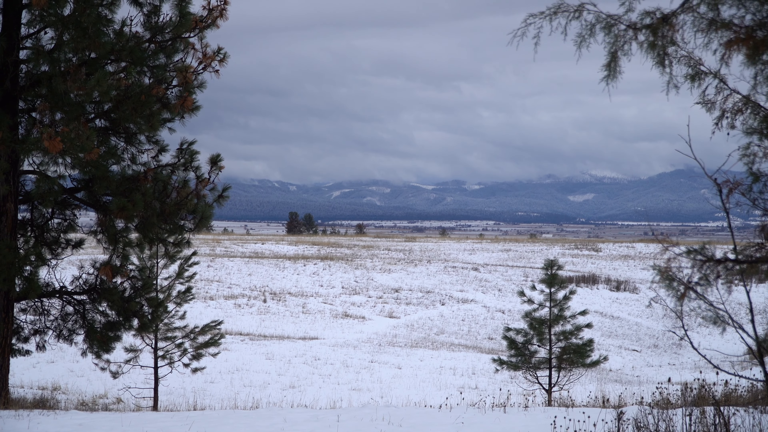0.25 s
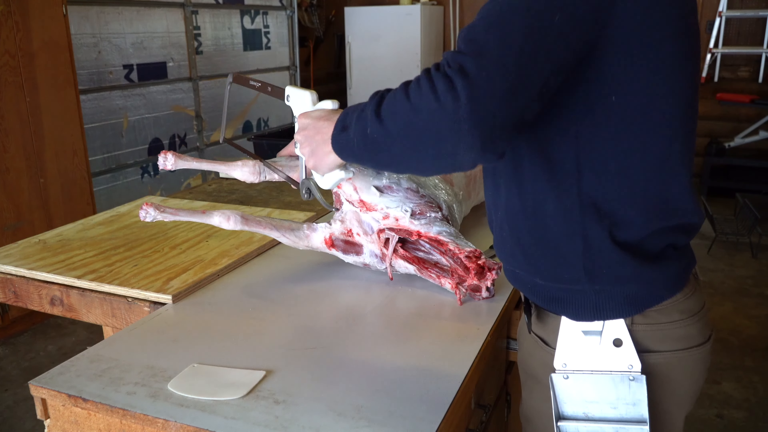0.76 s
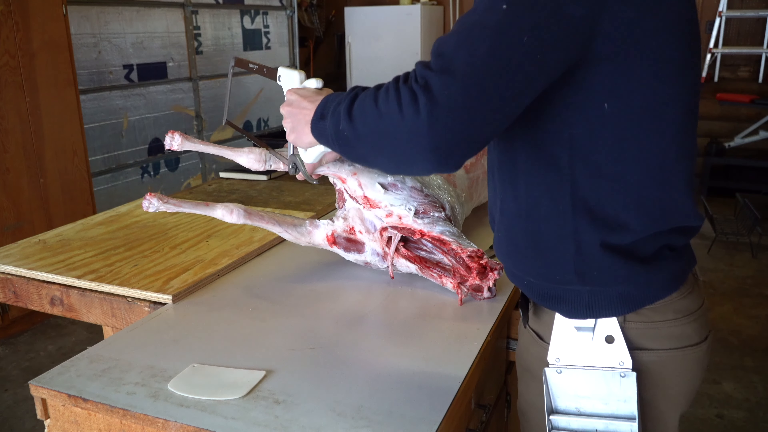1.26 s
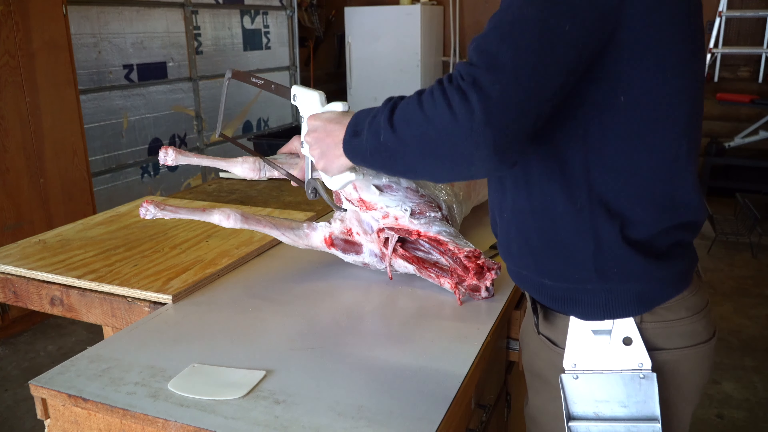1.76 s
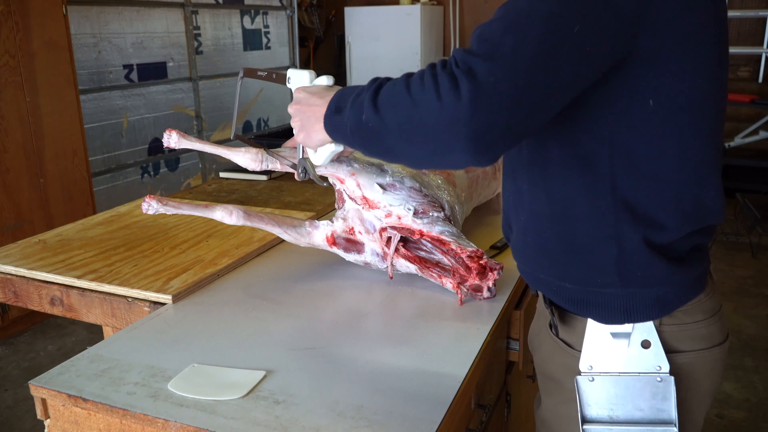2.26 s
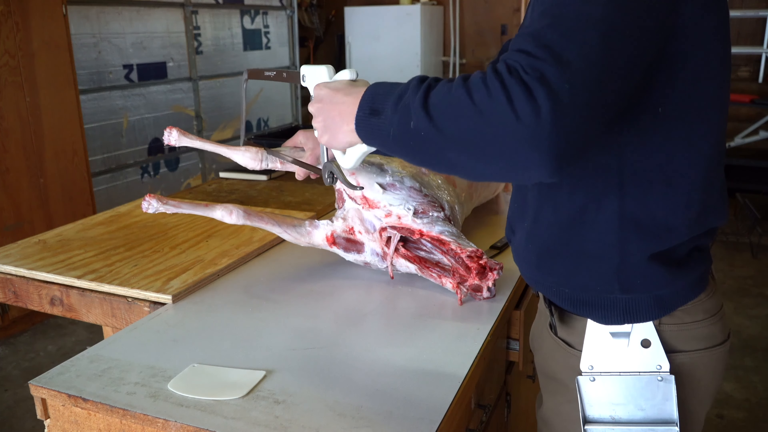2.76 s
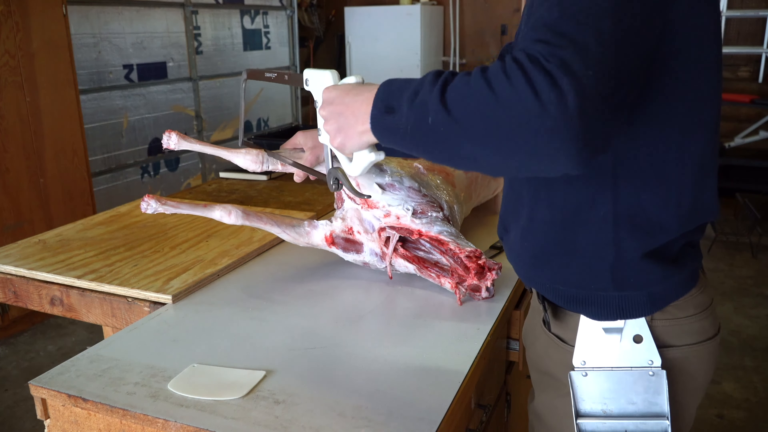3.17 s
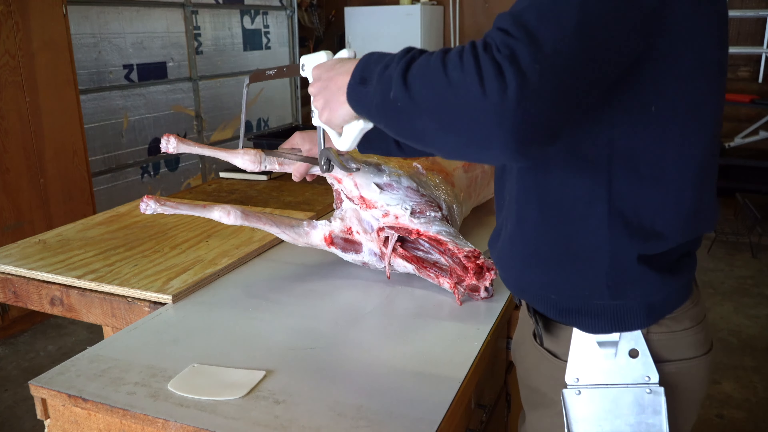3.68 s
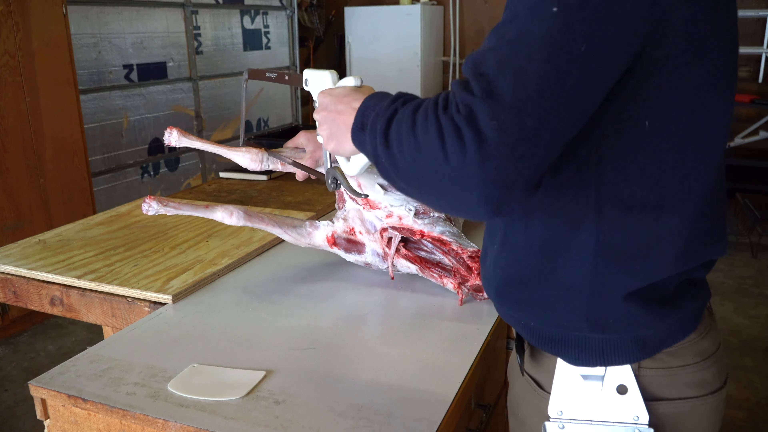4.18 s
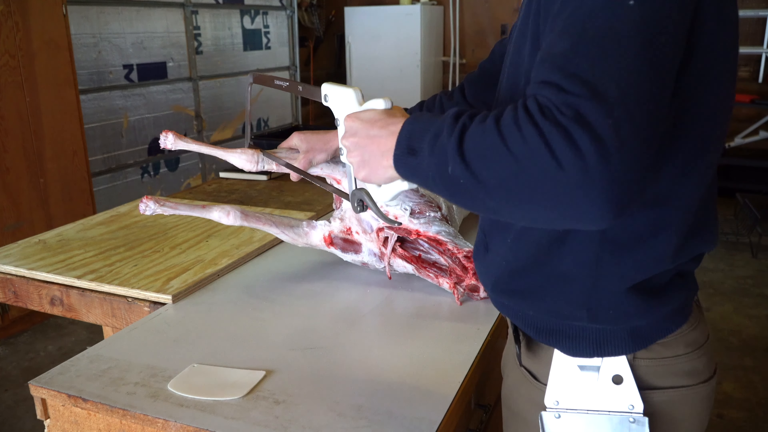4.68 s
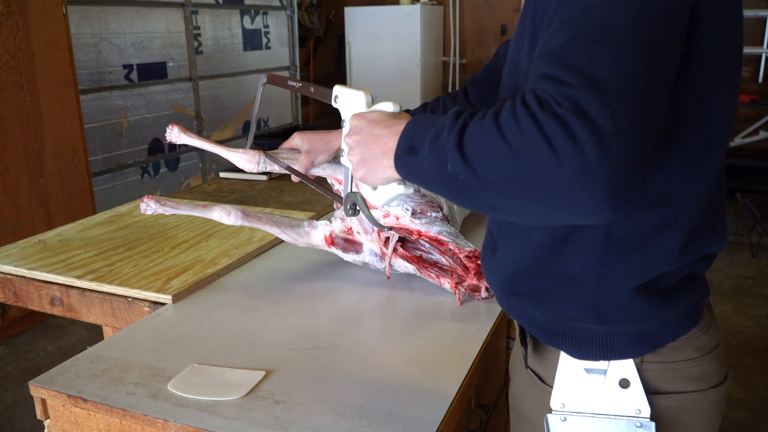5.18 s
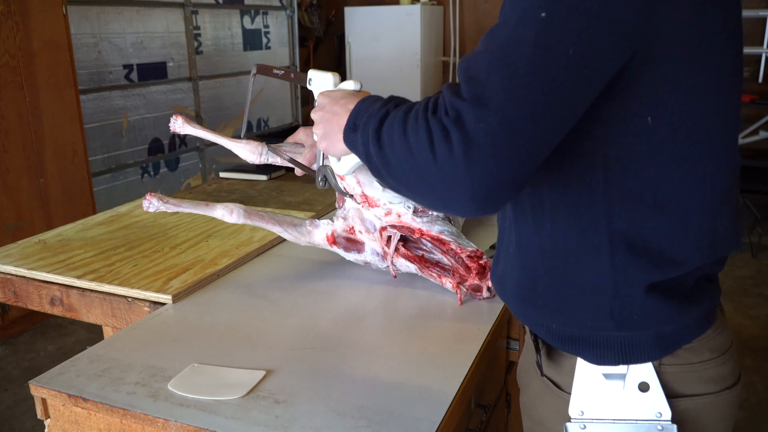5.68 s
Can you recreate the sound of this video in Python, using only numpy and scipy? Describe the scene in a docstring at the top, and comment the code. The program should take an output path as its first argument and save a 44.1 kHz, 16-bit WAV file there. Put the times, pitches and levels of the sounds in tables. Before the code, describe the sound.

Faint wind rumble, then a sudden change to indoor air and wavering low motor hum. A hand saw bites bone in brief, rough strokes, first isolated, later closer together and harder, some starting with a sharp knock. Steel sings brightly, the carcass judders softly on the table, and a short garage reverberation trails each stroke, heard from moderately close.

```python
"""A butcher's bow saw works through a carcass on a table in a garage, after half a second of low wind over a snowy field.
On each stroke the teeth chop into bone at a rate set by the arm's speed; they shake the carcass, throw grit and ring the blade.
Resonances swell under the teeth, the blade chatters, ticks and scuffs, and the carcass judders on the table.
The bare room rings on, over its air and a faint hum."""
import sys
import numpy as np
from scipy import signal
from scipy.fft import rfft, irfft
from scipy.io import wavfile

SR = 44100
rng = np.random.default_rng(int(sys.argv[2]) if len(sys.argv) > 2 else 0)


def unload_wav(signal):
    """Save mono or channel-first audio to the path in sys.argv[1] as 16-bit WAV at rate SR, clipped to [-1, 1]."""
    wavfile.write(
        sys.argv[1],
        SR,
        np.round(np.clip(np.atleast_2d(signal).T, -1, 1) * 32767).astype(np.int16),
    )


N = 261954
T = np.arange(N) / SR  # time in s

# the blade's cluster of high modes: pitch_hz, width_hz, relative level_db
BLADE_MODES = [(4820, 140, -8), (4933, 150, -16), (4970, 27, -15), (5604, 260, -14), (5450, 40, -8),
               (5534, 170, 5), (6020, 130, -18), (8980, 310, -15), (10600, 84, -81)]


def undb(db):
    """Decibels to gain."""
    return 10 ** (np.asarray(db) / 20)


def unit(x):
    """Scale to rms 1."""
    return x / np.sqrt(np.mean(x ** 2))


def convolve(x, response):
    """Pass a sound through an impulse response."""
    return signal.fftconvolve(x, response)[:len(x)]


def colour(x, points, size=2048):
    """Minimum-phase filter of unit energy through (Hz, dB) points."""
    hz, db = np.transpose(points)
    grid = np.maximum(np.arange(size + 1) * SR / (2 * size), 1)
    level_db = np.interp(np.log(grid), np.log(hz), db)
    # folding the cepstrum makes the response causal
    cepstrum = irfft(np.log(undb(level_db)))
    cepstrum[1:size] *= 2
    cepstrum[size + 1:] = 0
    response = irfft(np.exp(rfft(cepstrum)))
    return convolve(x, response / np.linalg.norm(response))


def walk(rate):
    """Random wandering through `rate` knots a second, spread near 1."""
    knots = rng.standard_normal(4096)
    return np.interp(T * rate, np.arange(len(knots)), knots)


def pulses(hz, jitter, scatter_db):
    """One click a cycle, uneven in time and size; also the phase within the cycle."""
    turns = np.cumsum(hz * (1 + jitter * walk(300))) / SR
    at = np.flatnonzero(np.diff(np.floor(turns)))
    # each click is shared between the two samples it falls between
    late = (np.floor(turns[at + 1]) - turns[at]) / (turns[at + 1] - turns[at])
    scatter = undb(scatter_db * rng.standard_normal(N)[:len(at)])
    sizes = scatter / np.sqrt(hz[at])  # faster clicks are smaller, for even power
    train = np.bincount(at, sizes * (1 - late), N) + np.bincount(at + 1, sizes * late, N)
    return unit(train - train.mean()), turns % 1


def grit(spread_db):
    """Dense tiny fractures as noise whose size varies from sample to sample."""
    spread = np.minimum(rng.exponential(size=N), 2 * np.pi)
    return unit(rng.standard_normal(N) * undb(spread_db * spread))


def ring(x, modes):
    """Damped modes struck together, alternating in sign; unit energy."""
    t = T[:SR // 2]
    response = 0
    for k, (hz, width, db) in enumerate(modes):
        decay = width * np.exp(-np.pi * width * t)
        response = response + (-1) ** k * undb(db) * decay * np.sin(2 * np.pi * hz * t)
    return convolve(x, response / np.linalg.norm(response))


def disperse(x, lag_at_1hz_s):
    """Bending waves run faster the higher they are, so each click arrives as a tiny downward chirp."""
    hz = np.arange(N // 2 + 1) * SR / N
    return irfft(rfft(x) * np.exp(-4j * np.pi * lag_at_1hz_s * np.sqrt(hz)), N)


def saw():
    """Teeth strike bone one after another; strikes shed grit, and rubbing in the same rhythm rings the steel."""
    # bone and bow in a shallow cut, then a deep one: pitch_hz, width_hz, relative level_db
    shallow_modes = [(762, 54, -11), (950, 52, -14), (1258, 14.2, 3.5), (1650, 110, -1), (1780, 26, -4.5),
                     (1850, 85, -8), (2650, 100, -4), (3008, 36, -1), (3820, 36, -54)]
    deep_modes = [(758, 12, -4), (902.3, 6.8, 2), (1240, 34, 3), (1335, 100, 1.5), (1638, 150, -8),
                  (1632, 32, -0.5), (1739, 71, -0.5), (1930, 35, -5), (2187, 17, -3), (2640, 230, -2.5),
                  (3253, 71, -5), (3327, 71, -6.5), (3580, 110, -26), (4174, 120, -11.5)]
    # the table top's resonances: pitch_hz, width_hz, relative level_db
    table_modes = [(93, 8.2, -4), (186, 46, 0.5), (238, 30, -12.5)]
    # colours of bone, tooth buzz, rubbing blade, bone dust and flesh: pitch_hz, relative level_db
    bone_colour = [(300, -14), (600, 1.5), (1000, -4.5), (1700, -6.5), (2300, -22.5), (2800, -1),
                   (3600, -0.5), (4400, -11.5), (6000, -9), (7500, -35), (12000, -54.5)]
    buzz_colour = [(300, -20), (600, 8), (1200, 5), (1900, 8.5), (3000, -0.5), (5000, -35)]
    blade_colour = [(3500, -23), (4500, 8.5), (5100, 18.5), (5550, 5), (6000, -9.5), (6800, -1.5),
                    (9000, -45)]
    dust_colour = [(3000, -14), (6000, 9.5), (7500, -1.5), (8500, 0), (9800, 3), (11000, -1), (13000, -3.5),
                   (15500, -19)]
    carcass_colour = [(30, -39), (70, -36.5), (170, -14), (340, 6), (560, 5), (800, 3.5), (1500, -47)]

    tooth_hz, gains = arm()
    # bone is uneven, so the bite comes and goes within a stroke
    bite, blade_gain, thrum = gains * undb(2.2 * walk(140))
    teeth, phase = pulses(tooth_hz, jitter=.03, scatter_db=2)
    teeth = disperse(teeth, lag_at_1hz_s=.1)
    strike = unit(.5 + np.exp(-phase / .4))
    chips = strike * grit(spread_db=2)
    cutting = bite * unit(teeth + undb(7) * chips)

    # the cut deepens from 0 to 1, and the resonances change with it
    depth = np.clip((T - 2.7) / 1.302, 0, 1)
    shallow = ring(cutting * np.sqrt(1 - depth), shallow_modes)
    deep = ring(cutting * np.sqrt(depth), deep_modes)
    bone = undb(-6.5) * colour(cutting, bone_colour) + undb(-4.5) * (shallow + deep)
    # the tooth rate stands out as a buzz, most of all in a shallow cut
    buzz = undb(-5 - 5 * depth) * colour(bite * teeth, buzz_colour)

    # the flat of the blade rubs the walls of the cut
    rubbing = blade_gain * strike * grit(spread_db=-0.5)
    blade = undb(-4.5) * colour(rubbing, blade_colour) + undb(-8) * ring(rubbing, BLADE_MODES)
    dust_gain = bite ** 0.5 * blade_gain ** 0.63
    dust = undb(-18) * colour(dust_gain * grit(spread_db=3.0), dust_colour)

    # soft flesh passes on mainly the tooth rate itself, and the table rumbles under it
    shaking = thrum * (teeth + undb(-10) * chips)
    carcass = undb(-4.0) * colour(shaking, carcass_colour)
    table = undb(-16.0) * ring(thrum * chips, table_modes)
    return bone + buzz + blade + dust + carcass + table


def arm():
    """Tooth rate and gains of bite, blade and carcass: each stroke engages, speeds up, slows and lets go."""
    # strokes of the saw: start_s, length_s, rising (share of it spent speeding up), top_tooth_rate_hz,
    # bite_db (drive at top speed), blade_db and thrum_db (blade ring and carcass thrum against bite)
    strokes = [ (0.687, 0.23, 0.62, 517.9, -23.5, -4, -7.5), (1.745, 0.15, 0.46, 399, -24.5, -3.5, -6.5),
               (2.117, 0.059, 0.26, 330, -34, 3.5, -4), (2.249, 0.039, 0.68, 249.7, -38.5, 1, -6.5),
               (2.514, 0.13, 0.41, 355.7, -27, -8, -3), (3.798, 0.14, 0.63, 233.3, -33.5, -8.5, -5),
               (4.162, 0.077, 0.48, 401.3, -27.5, 0.5, -8.5), (4.53, 0.144, 0.43, 297.1, -26.5, -11, -6.5),
               (4.768, 0.126, 0.6, 397.5, -21, -1.5, -11), (5.08, 0.12, 0.58, 368, -25, -8, -11.5),
               (5.614, 0.074, 0.84, 405, -20.5, 1, -12.5), (5.899, 0.090, 0.45, 298.6, -30, -6.5, -5.5), ]
    turn_teeth_hz = 227.8  # teeth passing each second at either end of a stroke
    attack_s, release_s = 0.012, 0.0041  # the teeth engage and let go
    # the arm presses less at the ends of a stroke
    slow_bite_db, slow_blade_db, slow_thrum_db = -9.5, -10, -6
    speed_curve = 1.3  # above 1 the arm holds its top speed longer
    swell_curve = 1.31  # above 1 the pressure lingers near its top
    db_per_octave = 5.5  # faster teeth cut louder
    lean_db, blade_lean_db = 6.5, -2  # through a stroke the thrum grows and the flesh damps the blade
    blade_lead = .35  # under 1 the blade sings before the teeth are fully in

    rate, gains = np.full(N, 1. * turn_teeth_hz), np.zeros((3, N))
    for start, length_s, rising, top_hz, bite_db, blade_db, thrum_db in strokes:
        now = (T >= start) & (T < start + length_s + release_s)
        t = T[now] - start
        speed = np.interp(t / length_s, [0, min(rising, 1), 1], [0, 1, 0])
        rate[now] = turn_teeth_hz + (top_hz - turn_teeth_hz) * (1 - (1 - speed) ** speed_curve)
        slack = (1 - speed) ** swell_curve
        lean = t / length_s - .5
        contact = np.clip(np.minimum(t / attack_s, 1 + (length_s - t) / release_s), 0, 1)
        effort = undb(bite_db + db_per_octave * np.log2(rate[now] / top_hz))
        bite = contact * undb(slow_bite_db * slack)
        blade = contact ** blade_lead * undb(blade_db + slow_blade_db * slack + blade_lean_db * lean)
        thrum = contact * undb(thrum_db + slow_thrum_db * slack + lean_db * lean)
        gains[:, now] += effort * np.array([bite, blade, thrum])
    return rate, np.hypot(gains, jolts())


def jolts():
    """Teeth slam into hard bone, a sudden extra load: mostly bite and thrum, little blade."""
    # jolts of the saw: start_s, length_s, drive level_db
    slams = [(2.122, 0.042, -35.5), (2.53, 0.011, -30), (3.822, .02, -37), (4.164, 0.011, -21),
             (4.769, 0.031, -22.5), (5.092, .014, -29.5), (5.617, 0.019, -16), (5.666, 0.012, -17.5)]
    rise_s = 0.0023
    blade_db, thrum_db = -18.5, -6  # against the jolt's own bite
    load = np.zeros(N)
    for s, length_s, db in slams:
        t = T[T >= s] - s
        load[T >= s] += undb(db) * np.minimum(t / rise_s, 1) * np.exp(-(t / length_s) ** 2)
    return np.outer(undb([0, blade_db, thrum_db]), load)


def bow_notes(rise_s, decay_s, rough):
    """A resonance of bow, blade or bone catches the teeth, builds up unevenly, then dies away."""
    # swelling notes: peak_s, pitch_hz, level_db (before the roughness)
    notes = [(0.726, 1263, -30), (0.786, 1202, -26), (1.77, 5380, -31), (1.808, 5260, -21.5),
             (1.82, 780, -21.5), (2.538, 567, -28), (2.583, 1229, -29.5), (4.174, 1676, -27),
             (4.643, 1251, -24.5), (5.165, 1692, -21.5), (5.633, 1653, -20), (5.672, 403.2, -27.5)]
    out = 0
    for s, hz, db in notes:
        swell = undb(db) * np.exp(np.minimum((T - s) / rise_s, (s - T) / decay_s))
        uneven = 1 + rough * walk(200)
        out = out + swell * uneven * np.sin(2 * np.pi * hz * T + rough * walk(hz / 6))
    return out


def chatter():
    """The blade sticks and slips evenly for a few cycles: a short, hard squawk."""
    # grabs of the blade: peak_s, slip_rate_hz, level_db, half_length_s (of a bell-shaped swell)
    grabs = [(0.808, 920, -16, 0.0049)]
    # colour of the squawk: pitch_hz, relative level_db
    squawk_colour = [(400, -59), (900, 4.5), (1850, 2.5), (2770, 6.5), (3700, -2.5), (5500, -2),
                     (7500, -47)]
    out = 0
    for s, hz, db, half_s in grabs:
        slips, _ = pulses(np.full(N, 1. * hz), jitter=.005, scatter_db=.5)
        squawk = colour(slips, squawk_colour)
        out = out + squawk * undb(db) * np.exp(-.5 * ((T - s) / half_s) ** 2)
    return out


def ticks():
    """Single teeth snag and let go: a brief crunch and a faint ring of the blade."""
    # teeth ticking in the cut: start_s, drive level_db, treble_db (against the middle)
    snags = [(0.574, -52, 2), (1.519, -56, 2), (1.544, -46.5, 4.5), (1.571, -51, -2), (1.601, -55.5, 5),
             (1.732, -52, 3.5), (1.796, -47, 14), (2.04, -38.5, -22), (2.708, -47, -30), (2.787, -37, -25),
             (2.953, -56.5, 10), (3.467, -42, -18), (3.769, -37.5, -19), (4.279, -47.5, 15.5),
             (5.567, -35, -8.5), (5.6, -61, 11)]
    # colours of the knock and of its treble: pitch_hz, relative level_db
    knock_colour = [(100, 5), (400, 2), (1200, 0.5), (2800, -7.5), (4500, -20), (9000, -66)]
    treble_colour = [(2000, 0.5), (4000, -3), (5400, 2), (6500, -12), (10000, -16), (15500, -33)]
    decay_s = 0.0093
    middle, top = np.zeros((2, N))
    for s, db, treble_db in snags:
        fall = undb(db) * (T >= s) * np.exp(-np.abs(T - s) / decay_s)
        middle += fall
        top += fall * undb(treble_db)
    crunch = grit(spread_db=3.0)
    knock = undb(-2) * colour(middle * crunch, knock_colour)
    treble = colour(top * crunch, treble_colour)
    return knock + treble + undb(-7.0) * ring(top * crunch, BLADE_MODES)


def scuffs(edge_s):
    """The blade slides through wet meat without biting: a hiss with a rough, falling squeak."""
    # light scuffs: start_s, length_s, drive level_db, squeak_start_hz, squeak_end_hz
    slides = [(3.211, 0.05, -48.5, 3740, 2296), (3.653, 0.045, -51, 2870, 2520),
              (4.1, 0.07, -52, 1722, 1606), (5.496, 0.054, -49.5, 2679, 2608)]
    # colour of the hiss: pitch_hz, relative level_db
    hiss_colour = [(200, 7.5), (1300, 2), (2600, 2), (4000, -1.5), (7000, -14.5), (14000, -39)]
    out, hiss = 0, colour(grit(spread_db=4.0), hiss_colour)
    for s, length_s, db, start_hz, end_hz in slides:
        gain = undb(db) * np.clip(np.minimum(T - s, s + length_s - T) / edge_s + .5, 0, 1)
        hz = np.interp(T, [s, s + length_s], [start_hz, end_hz])
        squeak = walk(550) * np.sin(2 * np.pi * np.cumsum(hz) / SR)
        out = out + gain * (undb(3) * hiss + undb(0.5) * squeak)
    return out


def judder():
    """The carcass creeps over the table top in low, quick slips."""
    # colour of the table top: pitch_hz, relative level_db
    table_colour = [(45, -30), (95, 5.5), (170, 0.5), (300, -5.5), (700, -48)]
    start_s, end_s, fade_s = 3.71, 3.94, 0.024
    slip_hz, level_db = 88.9, -44.5
    slips, _ = pulses(np.full(N, 1. * slip_hz), jitter=0.09, scatter_db=3)
    sliding = np.clip(np.minimum(T - start_s, end_s - T) / fade_s + .5, 0, 1)
    return colour(slips * sliding * undb(level_db), table_colour)


def room(x, early_db, late_db):
    """Table and nearby walls answer first, then a diffuse tail that dulls as it fades."""
    # the garage's decay: pitch_hz, t60_s (time to fall 60 dB)
    decay_times = [(150, 0.67), (500, 0.91), (1200, 0.78), (3000, 0.61), (5500, 0.61), (10000, 0.5)]
    t = T[:SR]
    hz, t60 = np.transpose(decay_times)
    noise, grid = rfft(rng.standard_normal(SR)), np.log(np.arange(SR // 2 + 1) + 1)
    tail = 0
    # overlapping bands of one noise, each fading at its own pace
    for share, life in zip(np.eye(len(hz)), t60):
        band = irfft(noise * np.interp(grid, np.log(hz), share), SR)
        tail = tail + band * np.exp(-np.log(1000) * t / life)
    tail = tail * (1 - np.exp(-t / 0.0053))
    # sparse echoes after the first 2 ms
    echoes = rng.standard_normal(SR) * (rng.random(SR) < .02)
    early = echoes * (t > .002) * np.exp(-t / 0.016)
    early = undb(early_db) * early / np.linalg.norm(early)
    late = undb(late_db) * tail / np.linalg.norm(tail)
    return convolve(x, early + late)


def background():
    """Low rumble of wind outdoors as shaped noise; indoors, drifting room air and a wavering hum."""
    # colours of the windy field and the garage air: pitch_hz, relative level_db
    field_colour = [(12, -10), (20, -1.5), (41, -8), (56, -23), (75, -24.5), (240, -32.5), (780, -31.5),
                    (1270, -40), (2000, -43.5), (3200, -47.5), (7000, -50), (15000, -54.5)]
    garage_colour = [(15, -22), (25, -19), (53, -7), (86, 3.5), (237, -0.5), (264, 1.5), (301, 0),
                     (373, 0.5), (515, -7.5), (573, -2), (856, -10.5), (1060, -10), (5570, -27.5),
                     (7280, -31.5), (15000, -40.5)]
    # an appliance motor's hum: pitch_hz, level_db (the centres both waver around)
    hum_tones = [(88, -67.5), (120, -91), (187, -64), (270, -66), (365, -64.5), (479, -67.5), (576, -68)]
    indoors = np.clip((T - .562) / 0.0026, 0, 1)  # field gives way to garage at 0.562 s
    wind = undb(-53.0) * colour(rng.standard_normal(N), field_colour, size=8192)
    drift = undb(walk(3.7))
    air = undb(-51.5) * drift * colour(rng.standard_normal(N), garage_colour, size=8192)
    hum = 0
    for hz, db in hum_tones:
        gain = undb(db + 1.5 * walk(18)) * np.sqrt(2)  # sqrt(2) makes the level rms
        turns = np.cumsum(hz + 3 * walk(12)) / SR
        hum = hum + gain * np.sin(2 * np.pi * turns)
    return (1 - indoors) * wind + indoors * (air + hum)


def scene():
    """All the work at the table, heard in the garage, over the background."""
    tones = bow_notes(rise_s=0.0077, decay_s=0.014, rough=0.99) + chatter()
    noises = saw() + ticks() + scuffs(edge_s=0.0028) + judder()
    # the flat steel beams its tones, so less of them reaches the walls
    to_walls = noises + undb(-3) * tones
    return (noises + tones + room(to_walls, early_db=-13, late_db=-11) + background())[None]


def record(dry):
    """A steep low-pass removes the top above 15.8 kHz."""
    return signal.sosfilt(signal.ellip(10, .2, 70, 15800, fs=SR, output="sos"), dry)


dry = scene()
out = record(dry)
unload_wav(out)
```